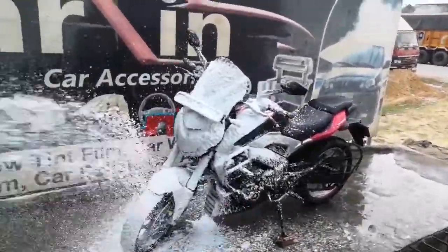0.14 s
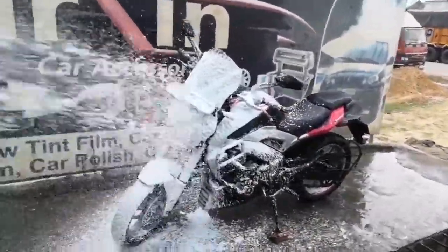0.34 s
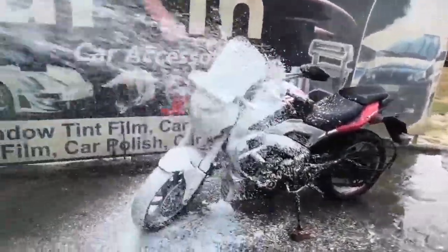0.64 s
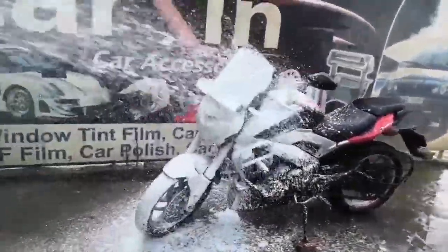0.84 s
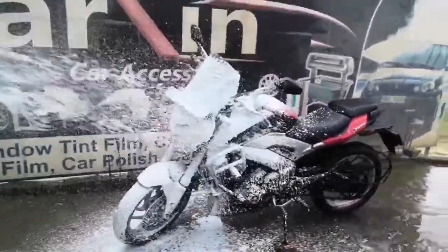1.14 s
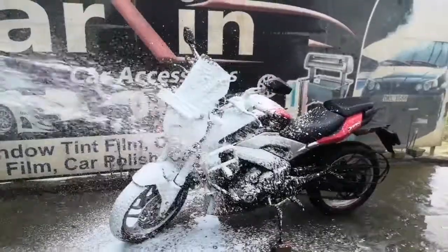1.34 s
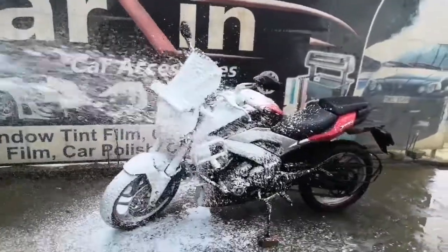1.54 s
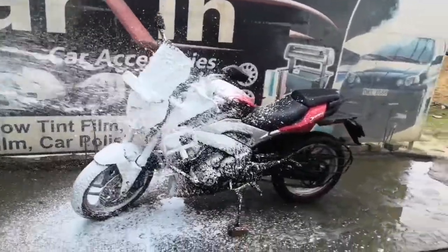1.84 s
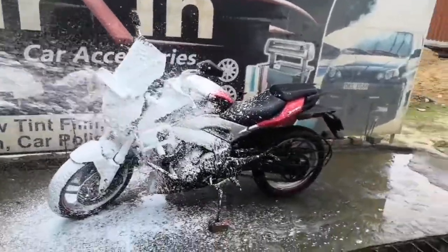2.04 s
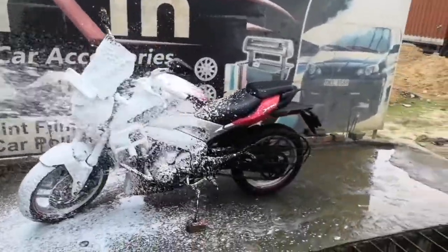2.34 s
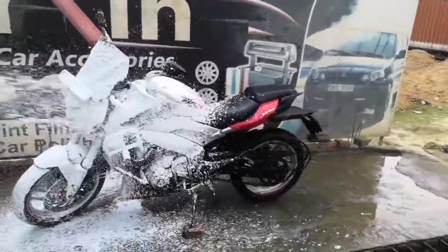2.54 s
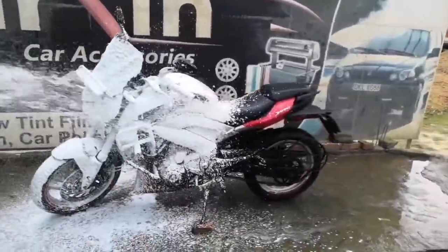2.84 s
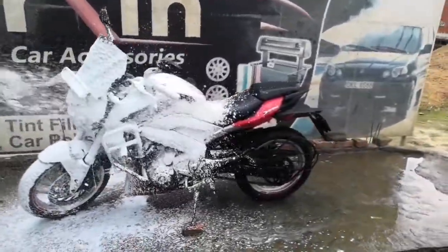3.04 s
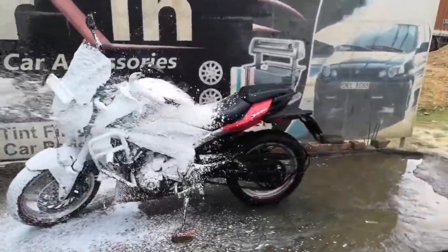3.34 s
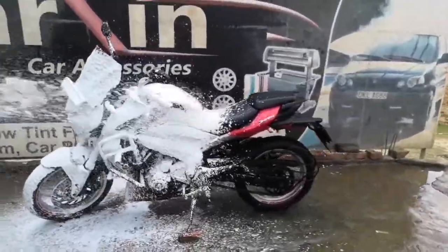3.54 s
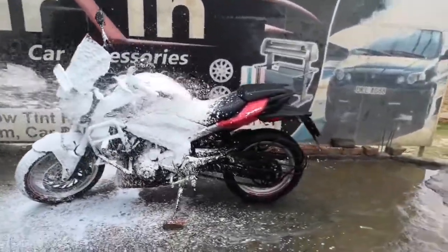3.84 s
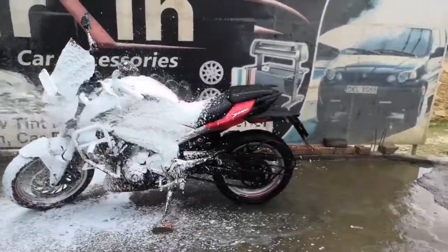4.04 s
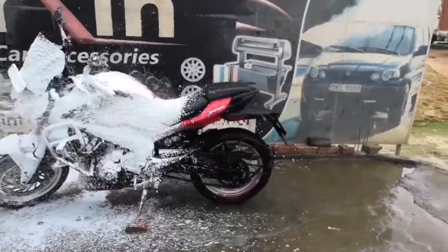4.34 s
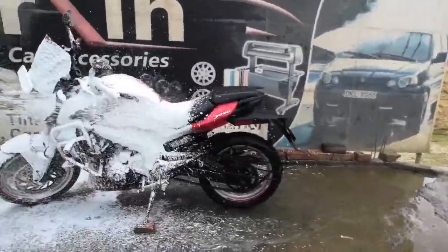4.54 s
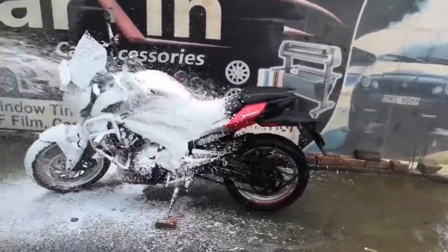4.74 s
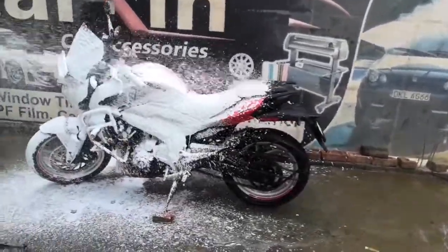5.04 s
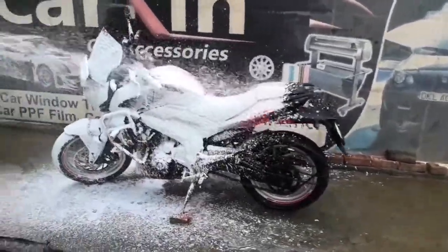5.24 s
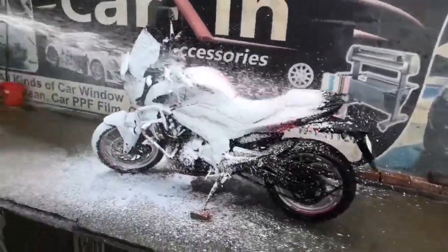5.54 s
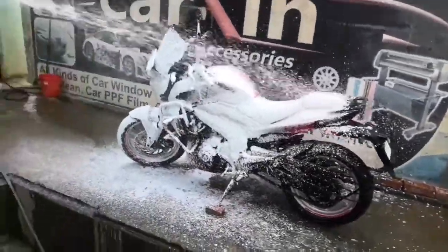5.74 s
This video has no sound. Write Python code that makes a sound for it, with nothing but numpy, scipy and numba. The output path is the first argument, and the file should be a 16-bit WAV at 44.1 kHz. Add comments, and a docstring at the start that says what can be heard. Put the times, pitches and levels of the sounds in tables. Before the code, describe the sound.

A foam lance hisses loudly with a breathy whistling note and slowly eases, over low road rumble, passing lorry drones and a brief brake squeal.

```python
"""A foam lance, a few metres left of a hand-held phone in an open wash bay, hisses throughout over road rumble.
At 0.15 s a finger taps the phone; from 0.5 s lorry engines drone past; from 1.5 to 2.35 s a brake squeals.
The lance moves off until 4.4 s. Its jet is noise, sung by chamber resonances; note and hiss reach the two
microphone ports directly, off the hand, off the wet floor and off nearby things. A separate high hiss wavers.
Rumble and low mids are filtered noise, drones and squeals gliding tones, the tap one pressure pulse."""
import sys
import numpy as np
from scipy import signal
from scipy.fft import rfft, irfft, next_fast_len
from scipy.io import wavfile
from scipy.ndimage import uniform_filter1d, map_coordinates
from numba import njit

SR = 44100
rng = np.random.default_rng(int(sys.argv[2]) if len(sys.argv) > 2 else 0)


def put_to_file(sound):
    """Save the sound as 16-bit audio at rate SR, in the file named by the first command-line argument."""
    columns = np.atleast_2d(sound).T  # one column per channel
    safe = np.clip(columns, -1, 1)
    whole_steps = np.round(safe * 32767)
    wavfile.write(sys.argv[1], SR, whole_steps.astype(np.int16))


N = 260190

T = np.arange(N) / SR
SIZE = next_fast_len(N)
HZ = np.maximum(np.arange(SIZE // 2 + 1) * SR / SIZE, 1)
PORT_SIDE = np.array([[.5], [-.5]])  # shares a left minus right level between the ports


def undb(db):
    """Level to amplitude ratio: 20 dB is a factor of ten."""
    return 10 ** (np.asarray(db) / 20)


def unit(x):
    """Normalization to an rms of 1."""
    return x / np.sqrt(np.mean(x ** 2))


def heard(pair):
    """Normalization of a port pair so that the mean of both has rms 1."""
    return pair / np.sqrt(np.mean(pair.mean(axis=0) ** 2))


def curves(table):
    """Linear interpolation in time: each column of a time table, one value a sample."""
    s, *columns = np.transpose(table)
    return [np.interp(T, s, column) for column in columns]


def walk(rate):
    """Low-pass random modulation: levels held 1 / rate s and slewed twice; spread near 1."""
    k = int(SR / rate)
    steps = np.repeat(rng.standard_normal(N // k + 1), k)
    slewed = uniform_filter1d(uniform_filter1d(steps, k), k)
    return 1.3 * slewed[:N]


def fade(start, end, fade_s):
    """Linear amplitude envelope, half open at start and at end."""
    return np.clip(np.minimum(T - start, end - T) / fade_s + .5, 0, 1)


def colour(x, table):
    """Zero-phase filtering: each row of x by its dB column, falling to 40 dB lower an octave outside."""
    hz, *dbs = np.transpose(table)
    edge = np.log(np.r_[hz[0] / 2, hz, hz[-1] * 2])
    gains = [undb(np.interp(np.log(HZ), edge, np.r_[db[0] - 40, db, db[-1] - 40])) for db in dbs]
    return irfft(rfft(x, SIZE) * np.array(gains), SIZE)[:, :N]


def restless(lo_hz, hi_hz, count, slow_db, quick_db, quick_rate):
    """Non-stationary noise: each band of white noise swells slowly and flickers quickly on its own."""
    spectrum, out = rfft(rng.standard_normal(SIZE)), 0
    centres = np.linspace(np.log(lo_hz), np.log(hi_hz), count)
    for k in range(count):
        share = np.interp(np.log(HZ), centres, np.arange(count) == k)
        band = irfft(spectrum * share, SIZE)[:N]
        out = out + band * undb(slow_db * walk(2.364) + quick_db * walk(quick_rate))
    return out


def narrow(hz, width_hz, order=1):
    """Resonance: noise through one-pole low-passes, shifted to a moving centre; order steepens the skirts."""
    slow = rng.standard_normal(N) + 1j * rng.standard_normal(N)
    for _ in range(order):
        slow = signal.lfilter([1], [1, -np.exp(-np.pi * width_hz / SR)], slow)
    carrier = np.exp(2j * np.pi * np.cumsum(hz) / SR)
    return unit((slow * carrier).real)


def late(x, ms):
    """Propagation delay, which may vary with time."""
    return map_coordinates(x, [np.arange(N) - ms * SR / 1000], order=3, mode="mirror")


# rumble and low mids: f/Hz, relative level in phase at both ports/dB, relative level in opposite phase/dB
YARD_SPECTRUM = [(24.9, -3.5, -33), (50, -1, -31), (105, 1, -17.5), (152, -1, -17), (303, -7.5, -19.5),
                 (390, -12.5, -18), (558, -16, -10.5), (587, -10, -6), (880, -16, -10.5), (1320, -13, -10),
                 (1490, -49, -11.5), (2144, -33, -11.5)]
# before the port filter: t/s, in-phase rumble level/dB, opposite-phase low-mid level/dB
LOW_LEVELS = [(0, -39.5, -27), (.5, -35.5, -30), (1, -35, -33), (1.7, -36, -33), (2.5, -35.5, -35),
              (3.2, -38, -34), (4, -36.5, -34.5), (4.7, -35, -34.5), (5.3, -36.5, -37), (5.9, -35.5, -37)]
# level of these sounds at each port: f/Hz, left gain/dB, right gain/dB
LOW_PORTS = [(20, -0.5, -1), (407, 0, 0.5), (660, -1, -5), (896, 2.5, -2.5), (1220, -2, -1.5),
             (3000, -7, 23.5)]


def yard():
    """Partial coherence: road rumble in phase in the bass, and the jet's low mids opposed at the ports."""
    noise = [restless(19.0, 2550, count=8, slow_db=1.73, quick_db=2.5, quick_rate=4.04) for _ in range(2)]
    shaped = colour(np.array(noise), YARD_SPECTRUM)
    mid, side = [unit(x) for x in shaped] * undb(curves(LOW_LEVELS))
    return colour(np.array([mid + side, mid - side]), LOW_PORTS)


# lorry engines passing: start t/s, end t/s, start f/Hz, end f/Hz, mean level/dB
ENGINES = [(0.48, 1.3, 45.7, 42.7, -42), (0.805, 1.355, 131.3, 145.9, -42), (0.909, 1.15, 66, 65, -41.5),
           (0.997, 2.12, 298.8, 298, -52), (1.447, 1.845, 72.5, 78, -37.5),
           (1.747, 2.097, 126.4, 128.4, -44), (2.091, 2.546, 108, 106.3, -39.5),
           (2.389, 2.851, 86.75, 86.3, -36), (2.555, 3.14, 148, 150, -41.5), (2.95, 3.213, 71.7, 70, -39.5),
           (3.452, 3.68, 63, 61.2, -39.5), (4.3, 5.2, 50, 50, -44), (4.757, 5.25, 165, 158.8, -44.5)]
DRONE_WIDTH_HZ, DRONE_ROUGH_DB = 7, -17  # noise around each tone; its level relative to the tone


def drones():
    """Periodic excitation: engine firing tones that slide with speed and waver in pitch and level."""
    out = 0
    for start, end, hz0, hz1, db in ENGINES:
        hz = np.interp(T, [start, end], [hz0, hz1]) * (1 + .008 * walk(6))
        phase = np.cumsum(hz) / SR + rng.random()
        firing = np.sqrt(2) * np.sin(2 * np.pi * phase)
        rough = undb(DRONE_ROUGH_DB) * narrow(hz, DRONE_WIDTH_HZ, order=2)
        out = out + undb(db + 1.2 * walk(10)) * fade(start, end, 0.1) * unit(firing + rough)
    return out


# brake squeals at the left port: start t/s, end t/s, start f/Hz, end f/Hz, pole width/Hz, level/dB
BRAKES = [(1.47, 1.53, 7050, 7050, 300, -43), (1.74, 1.79, 7100, 7050, 300, -45),
          (2.1, 2.32, 7060, 7020, 200, -42), (1.82, 1.97, 3715, 3710, 45, -31),
          (1.98, 2.08, 3708, 3704, 45, -27), (2.1, 2.19, 3702, 3700, 45, -27.5),
          (2.21, 2.35, 3698, 3694, 45, -28.5)]
SQUEAL_RUB_DB, SQUEAL_FADE_S = -3, .035  # rough halo relative to the whistle; longest fade


def squeals():
    """Friction-driven vibration: pads rub a wavering whistle in a rough halo out of a drum."""
    out = 0
    for start, end, hz0, hz1, width_hz, db in BRAKES:
        hz = np.interp(T, [start, end], [hz0, hz1])
        wavering_hz = hz + .3 * width_hz * walk(40)
        whistle = np.sqrt(2) * np.sin(2 * np.pi * np.cumsum(wavering_hz) / SR)
        halo = undb(SQUEAL_RUB_DB) * narrow(hz, width_hz, order=2)
        fade_s = min(SQUEAL_FADE_S, (end - start) / 2)
        out = out + undb(db) * fade(start, end, fade_s) * unit(whistle + halo)
    return np.array([late(out, .04), undb(1.5) * out])  # right port first and louder


TAP_S, TAP_DB = .1539, -12  # time; mean of the two port levels, for the push alone
TAP_RISE_S, TAP_FALL_S = .0009, .003  # time constants of the push
NAIL_DB, NAIL_S = -8, .00015  # tick relative to the push; its time constant


def tap():
    """Impulsive excitation: a fingertip on the case pushes both diaphragms alike, the left a little harder."""
    t = T - TAP_S
    push = np.exp(-np.abs(t) / np.where(t < 0, TAP_RISE_S, TAP_FALL_S))
    nail = undb(NAIL_DB) * np.exp(-np.abs(t) / NAIL_S)  # ticks at the stop
    return undb(TAP_DB + np.array([[1.], [-1.]])) * (push + nail)


# the phone turns in the hand: t/s, right port delay after left/ms, hand echo delay after left/ms,
# hand echo level before echo loss/dB
HAND_PATHS = [(0, .51, 1.54, -8), (.5, .46, 1.30, -8), (.75, .44, 1.17, -9), (1.05, .435, 1.10, -10),
              (1.4, .45, .98, -10), (1.8, .45, .95, -11), (2.3, .46, .96, -11), (3.3, .46, .97, -9),
              (4.4, .485, .98, -7), (4.8, .44, .92, -7), (5.2, .42, .90, -8), (5.65, .37, .86, -9),
              (5.9, .36, .85, -9)]
# echoes off the bike, wall and body: left delay/floor delay, right delay/floor delay
NEARBY_SHARES = [(.33, .31), (.5, .52), (.74, .62), (1.45, .88), (1.9, 1.6), (2.3, 2.1)]
NEARBY_DB, NEARBY_SWAY_MS = -15, .08  # level before echo loss; random delay spread
# until the lance halts, the detour via the floor shrinks and its echo grows
FLOOR_MS, FLOOR_MS_PER_S, HALT_S = 6.88, -.455, 4.4
FLOOR_DB, FLOOR_DB_PER_S = -13, 1.5  # before echo loss


def ports(x, echo_loss_db, lead_ms=0):
    """Multipath interference: direct sound plus hand (right port only), floor and nearby reflections."""
    right_ms, hand_ms, hand_db = curves(HAND_PATHS)
    moving_s = np.minimum(T, HALT_S)
    floor_ms = FLOOR_MS + FLOOR_MS_PER_S * moving_s
    floor_db = FLOOR_DB + FLOOR_DB_PER_S * moving_s
    left = x + undb(floor_db - echo_loss_db) * late(x, floor_ms)
    hand = undb(hand_db - echo_loss_db) * late(x, hand_ms)
    out = np.array([left, late(left, right_ms - lead_ms) + hand])
    for shares in NEARBY_SHARES:
        for port, share in enumerate(shares):
            # paths shrink as the lance moves and breathe as the phone sways
            ms = share * floor_ms + NEARBY_SWAY_MS * walk(1.364)
            out[port] += undb(NEARBY_DB - echo_loss_db) * np.interp(T - ms / 1000, T, x)
    return np.array([unit(port) for port in out])


# high hiss spectrum at each port: f/Hz, left relative level/dB, right relative level/dB
HIGH_SPECTRUM = [(6500, -8.5, -6), (7330, 6, 6), (7770, 4.5, -5), (8200, -1.5, -13), (8550, 0.5, -2),
                 (9450, 1.5, -11), (10600, -5, -23.5), (12700, -10.5, -16), (13000, -18.5, -22),
                 (15000, -16, -30)]
# brief swells of the high hiss: t/s, rise in level/dB
HIGH_SWELLS = [(1.08, 3.5), (2.2, 1.5), (4.65, 3.5)]
SWELL_S = 0.084  # half-width of a swell where its dB rise is down to 1/e
HIGH_DB, HIGH_DB_PER_S = -51, .5


def high_hiss():
    """Incoherent noise: hiss above 7 kHz, separate at each port, its level wavering quickly at both."""
    swells_db = sum(db * np.exp(-((T - s) / SWELL_S) ** 2) for s, db in HIGH_SWELLS)
    noise = np.array([restless(8060, 12600, count=7, slow_db=-1.5, quick_db=2.0, quick_rate=16)
                      for _ in range(2)])
    noise = noise * undb(1.2 * walk(16))
    return heard(colour(noise, HIGH_SPECTRUM)) * undb(HIGH_DB + HIGH_DB_PER_S * T + swells_db)


MODE_DRIFT = .003  # spread of a mode's pitch, as a fraction
NOTE_HZ, NOTE_WIDTH_HZ = 1885, 115
NOTE_LEAD_MS, NOTE_SEPARATE_DB = .028, -14  # shorter right port lag; separate part relative to the shared


def chamber_note():
    """Cavity resonance: jet noise rings in the lowest chamber mode; a weak part differs between the ports."""
    hz = NOTE_HZ * (1 + MODE_DRIFT * walk(4))
    note = ports(narrow(hz, NOTE_WIDTH_HZ), 21.0, NOTE_LEAD_MS)
    separate = np.array([narrow(hz, NOTE_WIDTH_HZ) for _ in range(2)])
    note = note + undb(NOTE_SEPARATE_DB) * separate
    # the chamber hardly radiates below its lowest mode
    note = signal.sosfilt(signal.butter(4, [1620, 2500], "band", fs=SR, output="sos"), note)
    return heard(note)


# upper chamber modes: t/s, second mode f/Hz, second mode level/dB, left minus right level of both modes/dB,
# third mode level/dB
UPPER_MODES = [(0, 3940, -42, -5, -43), (.3, 4190, -36, -9, -45), (.6, 4050, -54, 3, -27),
               (1, 4000, -33.5, 1, -33), (1.4, 3950, -33, 5, -31), (2.2, 3963, -35.5, 9, -41),
               (2.9, 4050, -39, 8, -39), (3.5, 4040, -43, 10, -36), (4, 3995, -29.5, -10, -43),
               (4.6, 4090, -32.5, 10, -52), (5, 4250, -32.5, -2, -51), (5.2, 4150, -42, 0, -34),
               (5.45, 4054, -45, 8, -59), (5.65, 3880, -33, -11, -44), (5.9, 3950, -32.5, -5, -33)]
SECOND_WIDTH_HZ, SECOND_LAG_MS = 200, .485  # pole width; steady lag of the right port
THIRD_HZ, THIRD_WIDTH_HZ, THIRD_LAG_MS = 4620, 150, .49


def chamber_overtones():
    """Higher cavity modes: two narrow bands of noise with a steady delay between the ports."""
    second_hz, second_db, pan_db, third_db = curves(UPPER_MODES)
    second = narrow(second_hz, SECOND_WIDTH_HZ, order=2)
    third = narrow(THIRD_HZ * (1 + MODE_DRIFT * walk(2)), THIRD_WIDTH_HZ, order=2)
    second = undb(second_db) * np.array([second, late(second, SECOND_LAG_MS)])
    third = undb(third_db) * np.array([third, late(third, THIRD_LAG_MS)])
    return (second + third) * undb(PORT_SIDE * pan_db)


@njit
def svf(x, hz, width_hz):
    """State-variable resonator: band-pass with a moving centre, gain 1 at the centre."""
    y, b, l = np.empty(len(x)), 0., 0.  # output, band state, low state
    for i in range(len(x)):
        g, k = np.tan(np.pi * hz[i] / SR), width_hz / hz[i]
        v = (b + g * (x[i] - l)) / (1 + g * (g + k))
        b, l, y[i] = 2 * v - b, l + 2 * g * v, k * v
    return y


# sliding bands of the right port's hiss: t/s, first f/Hz, first gain/dB, second f/Hz, second gain/dB
SLIDING_BANDS = [(0, 3900, 2.5, 5300, -3), (.3, 4350, 8, 5560, 0), (.5, 4750, 4.5, 3620, -2.5),
                 (.75, 5600, 3.5, 3150, -9), (1, 5860, 6.5, 3100, -5), (1.3, 5800, -4, 3000, -2),
                 (2, 4560, 2.5, 2430, -15), (2.9, 4650, 2.5, 2460, -5), (3.9, 4400, 1, 3080, -4.5),
                 (4.6, 5600, 4, 3400, 3), (4.95, 5100, 5.5, 3270, -4), (5.2, 4700, 3, 3550, 5),
                 (5.45, 5940, 3.5, 3380, 6), (5.7, 4650, -2.5, 3400, 2), (5.9, 4700, 1, 3400, 2)]
FIRST_BAND_HZ, SECOND_BAND_HZ = 700., 600.  # widths


def slide_bands(x):
    """Time-varying equalization: two bands of the right port's hiss, each raised or lowered as it slides."""
    first_hz, first_db, second_hz, second_db = curves(SLIDING_BANDS)
    x = x + (undb(first_db) - 1) * svf(x, first_hz, FIRST_BAND_HZ)
    return x + (undb(second_db) - 1) * svf(x, second_hz, SECOND_BAND_HZ)


# phase of the right port's hiss by frequency: f/Hz, phase shift/rad
HISS_PHASE = [(2100, 0), (2600, -.9), (3000, 0), (3400, -1.1), (3900, -.4), (4300, -.7), (4700, -2.6),
              (5000, -4.4), (5500, -5.3), (6200, -6), (7000, -6.28)]


def shift_phase(x):
    """Dispersion: a phase shift that depends on frequency."""
    shift = np.interp(HZ, *np.transpose(HISS_PHASE))
    return irfft(rfft(x, SIZE) * np.exp(1j * shift), SIZE)[:N]


# jet hiss spectrum at each port: f/Hz, left relative level/dB, right relative level/dB
HISS_SPECTRUM = [(1220, -18.5, -9), (1516, -9, -14), (1710, 4.5, -7), (2110, -14, 5), (2200, -2.5, -0.5),
                 (2390, -0.5, 1), (2740, -3.5, -6.5), (3150, -10, -0.5), (3370, -2.5, -0.5),
                 (4050, -1.5, -1), (4400, -4.5, -2), (4750, -5.5, -2), (5100, -10, -4.5), (5650, -10, -4.5),
                 (6060, -12, -10.5), (6400, -21, -11.5), (6820, -14.5, -10), (8030, -27, -33)]
# level of the part of the hiss that differs between ports: f/Hz, left/dB, right/dB
SEPARATE_SPECTRUM = [(1000, 0, 0), (2000, -2, -2), (2500, -6, -6), (3000, 3, 3), (3500, 2, 2), (4500, 7, 7),
                     (5500, 5, 5), (6200, 3, 3), (7000, 0, 0), (9000, 0, 0)]
SEPARATE_DB, SEPARATE_DB_PER_S = -10, 1.3  # gain of that part, on top of the table


def jet_hiss(treble_db):
    """Turbulent jet noise: a part shared by both ports plus an incoherent part that differs between them."""
    jet = restless(1530, 6960, count=11, slow_db=1.5, quick_db=1.8, quick_rate=12)
    left, right = ports(unit(jet), 0)
    shared = np.array([left, shift_phase(right)])
    # the separate noises meet the same floor
    separate = np.array([ports(rng.standard_normal(N), 0)[port] for port in range(2)])
    separate = undb(SEPARATE_DB + SEPARATE_DB_PER_S * T) * colour(separate, SEPARATE_SPECTRUM)
    left, right = colour(shared + separate, HISS_SPECTRUM)
    treble = signal.sosfiltfilt(signal.butter(3, 5100, "high", fs=SR, output="sos"), right)
    right = right + (undb(treble_db) - 1) * treble
    return heard(np.array([left, slide_bands(right)]))


# the lance at the ports: t/s, chamber note level/dB, jet hiss level/dB, note left minus right level/dB,
# hiss left minus right level/dB, gain of the hiss treble at the right port/dB
LANCE_LEVELS = [(0, -25.5, -22.5, -6, -5.5, -8), (.3, -21.5, -22, -0.5, 1.5, -0.5),
                (.65, -20, -21, -8.5, 1.5, 1.5), (.9, -20.5, -24.5, -2.5, 4, 2.5),
                (1.3, -21, -26, -1, 8.5, 8), (1.7, -22.5, -25, 0, 7, 6.5), (2.2, -24.5, -22.5, 2, 0.5, -9),
                (2.85, -23, -26, 1, 4.5, 2), (3.4, -25.5, -24.5, 2, -0.5, -5),
                (4.3, -28.5, -25.5, 6, 3.5, -3.5), (4.9, -29, -27, 3, 0, -1.5),
                (5.35, -27, -28.5, 0, 4.5, 5), (5.9, -28.5, -29, 6, -1.5, 0.5)]


def lance():
    """Superposition: chamber note, upper modes, jet hiss and high hiss add as pressures."""
    note_db, hiss_db, note_pan, hiss_pan, treble_db = curves(LANCE_LEVELS)
    note = chamber_note() * undb(note_db + PORT_SIDE * note_pan)
    hiss = jet_hiss(treble_db) * undb(hiss_db + PORT_SIDE * hiss_pan)
    return high_hiss() + note + chamber_overtones() + hiss


def scene():
    """Superposition of road, engines, brake, tap and lance at the two ports."""
    return yard() + drones() + squeals() + tap() + lance()


def record(dry):
    """Band limiting: the phone weakens the deepest bass below 18 Hz and cuts the top above 15040 Hz."""
    dry = signal.sosfilt(signal.butter(1, 18, "high", fs=SR, output="sos"), dry)
    return signal.sosfilt(signal.ellip(14, .2, 90, 15040, fs=SR, output="sos"), dry)


dry = scene()
out = record(dry)
put_to_file(out)
```